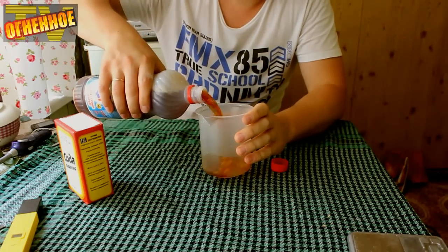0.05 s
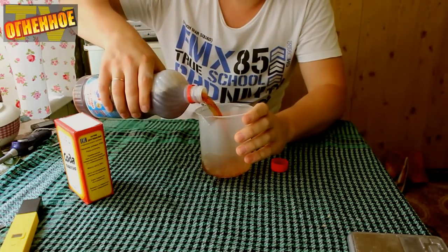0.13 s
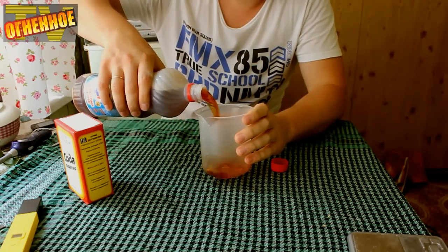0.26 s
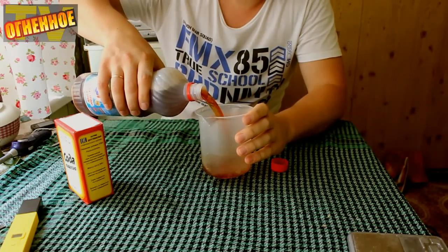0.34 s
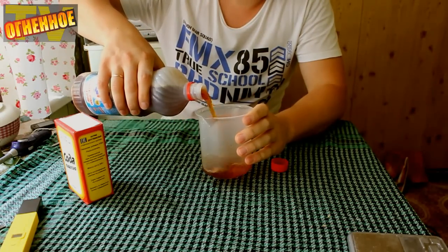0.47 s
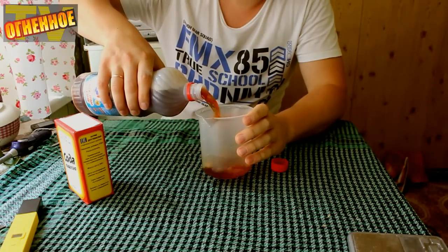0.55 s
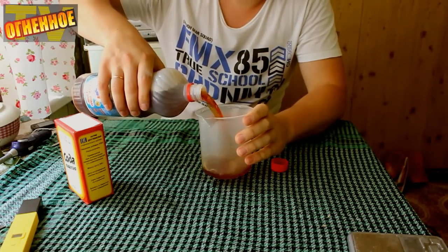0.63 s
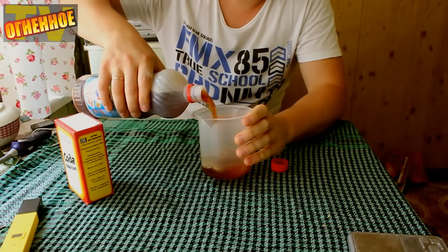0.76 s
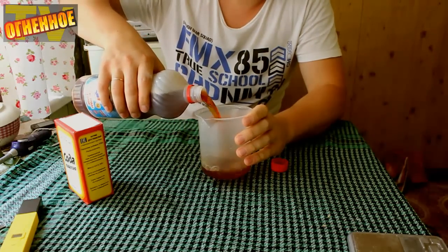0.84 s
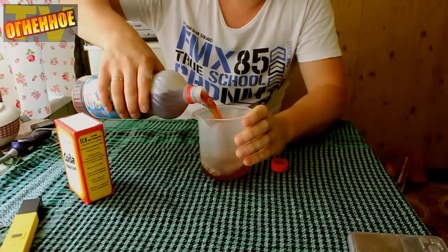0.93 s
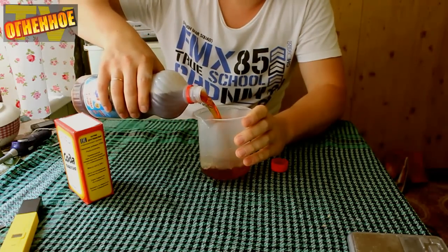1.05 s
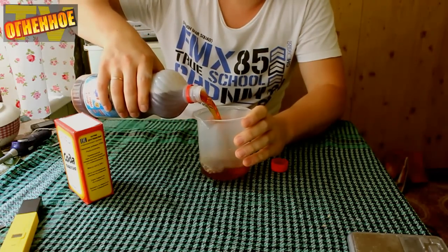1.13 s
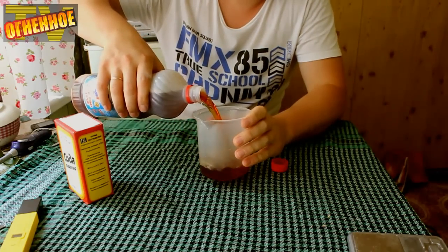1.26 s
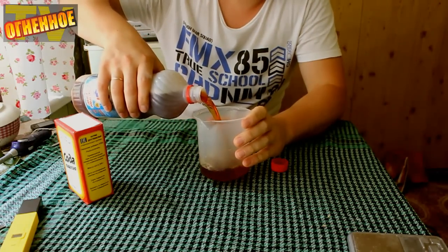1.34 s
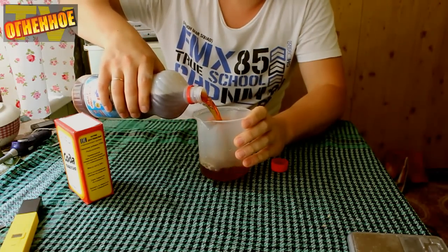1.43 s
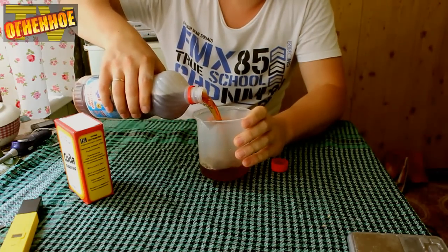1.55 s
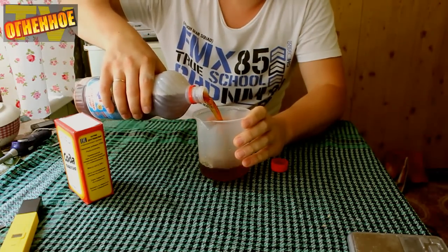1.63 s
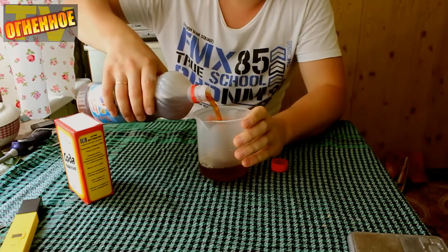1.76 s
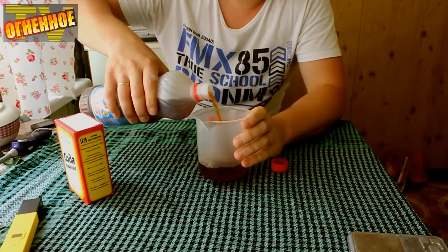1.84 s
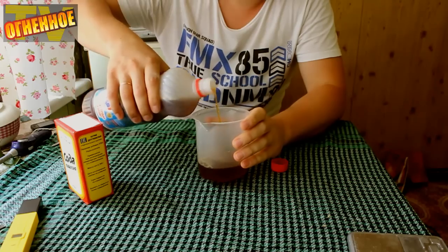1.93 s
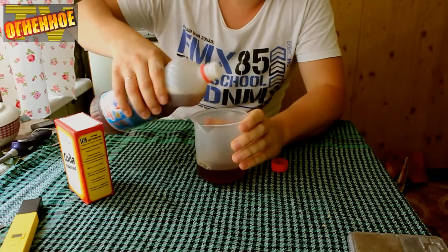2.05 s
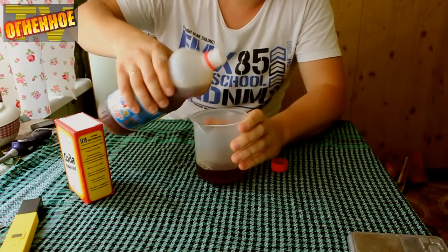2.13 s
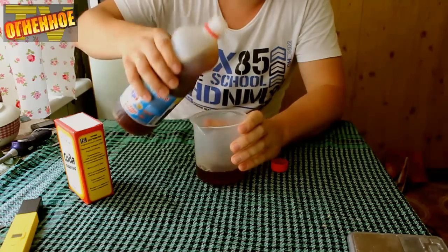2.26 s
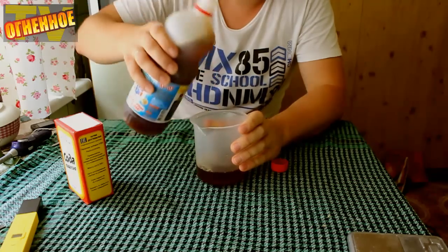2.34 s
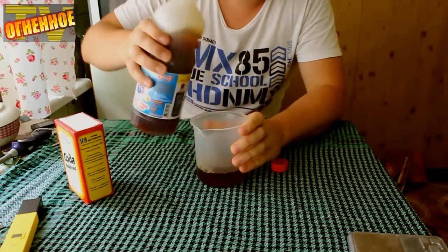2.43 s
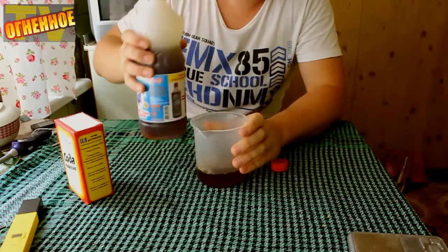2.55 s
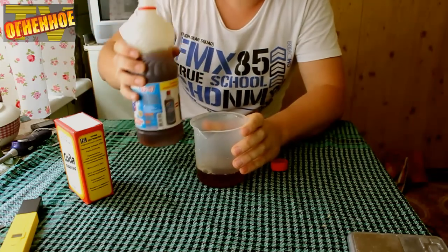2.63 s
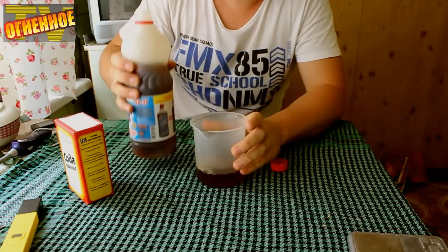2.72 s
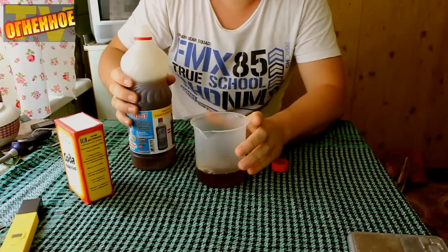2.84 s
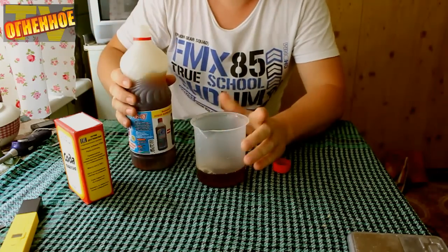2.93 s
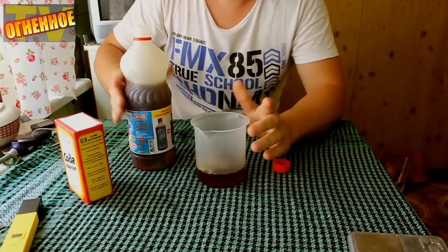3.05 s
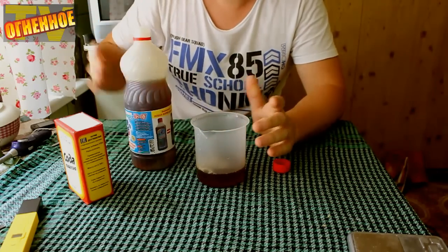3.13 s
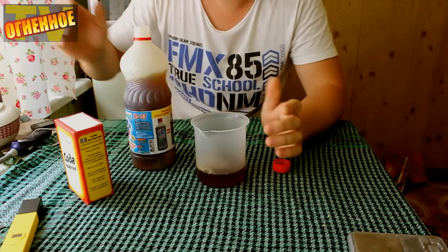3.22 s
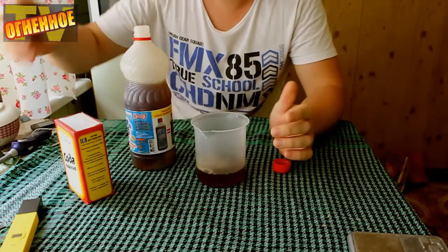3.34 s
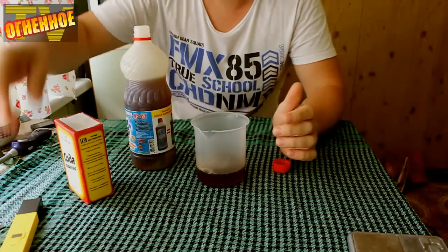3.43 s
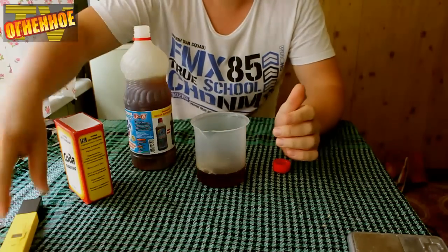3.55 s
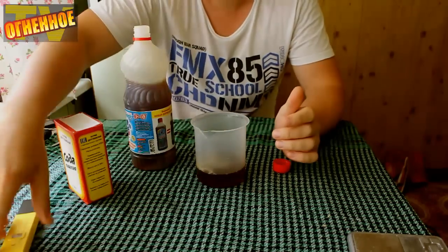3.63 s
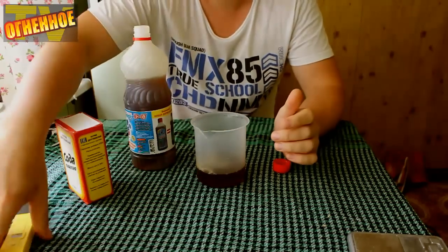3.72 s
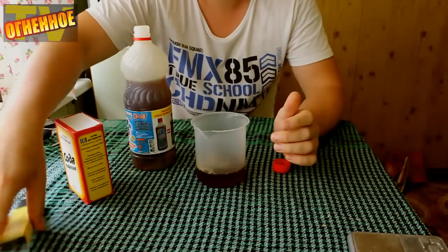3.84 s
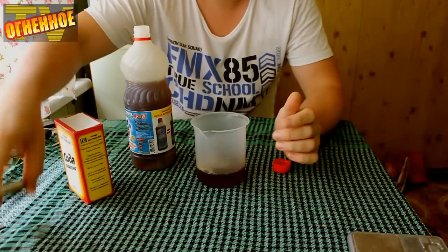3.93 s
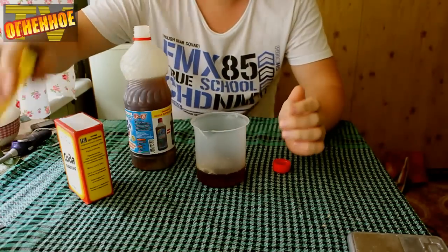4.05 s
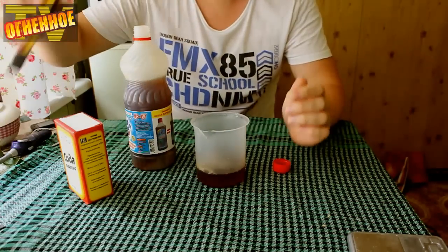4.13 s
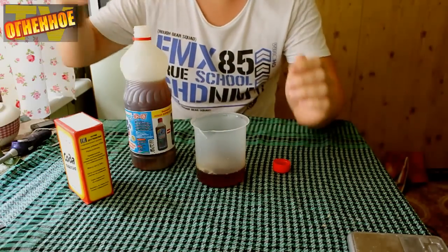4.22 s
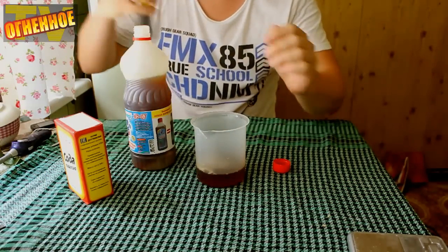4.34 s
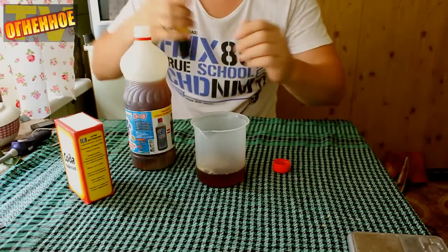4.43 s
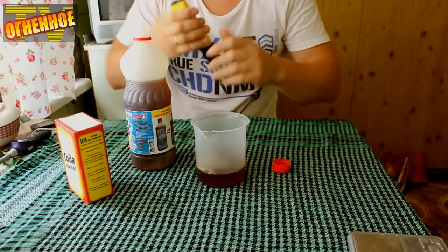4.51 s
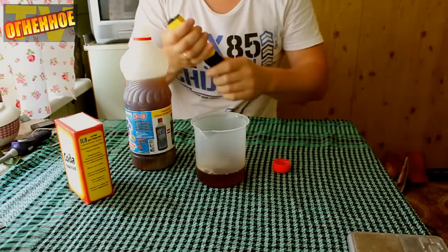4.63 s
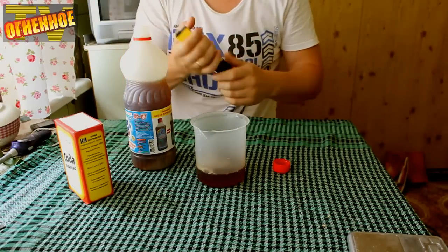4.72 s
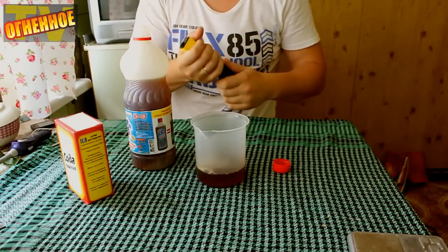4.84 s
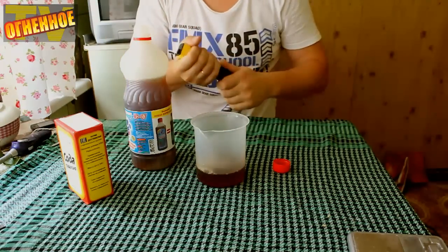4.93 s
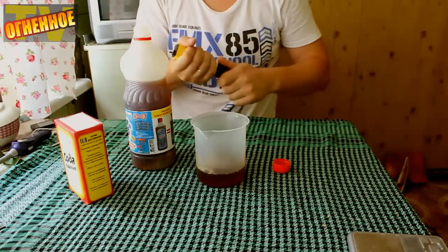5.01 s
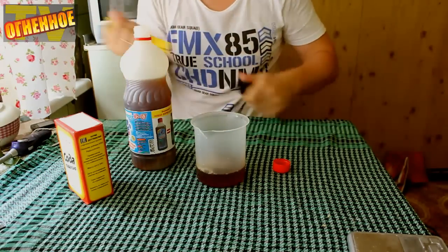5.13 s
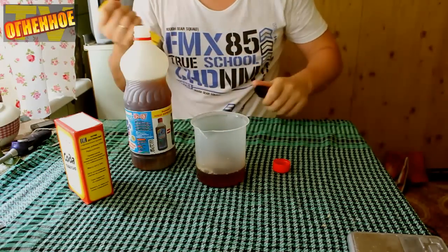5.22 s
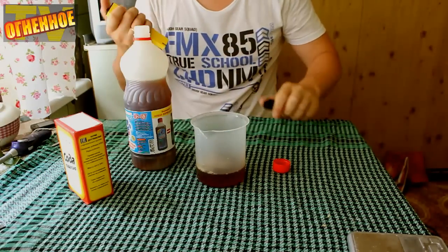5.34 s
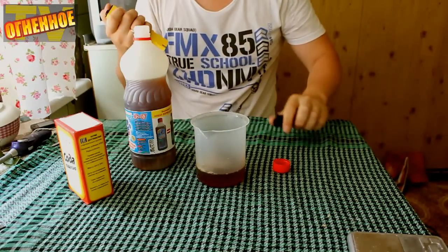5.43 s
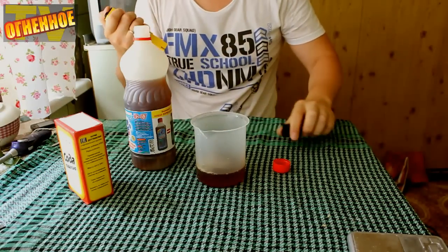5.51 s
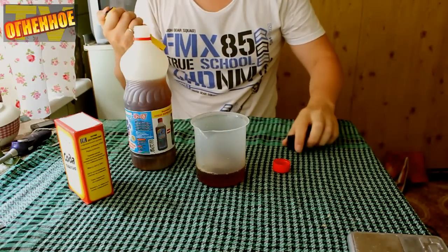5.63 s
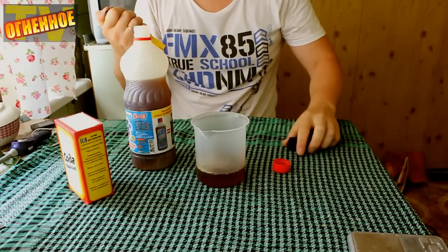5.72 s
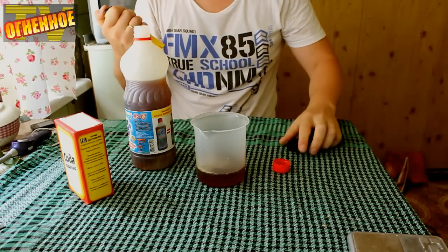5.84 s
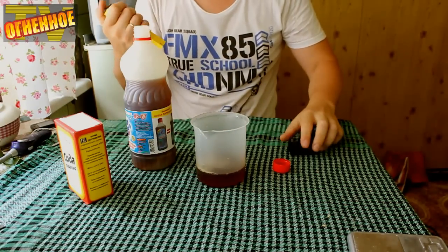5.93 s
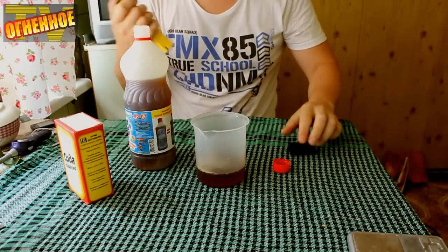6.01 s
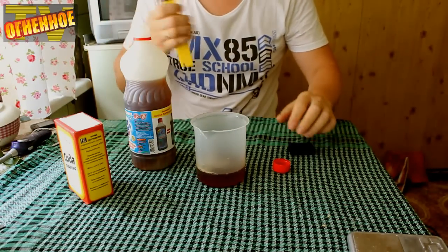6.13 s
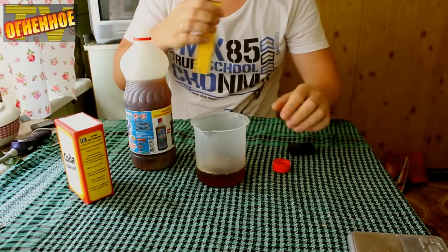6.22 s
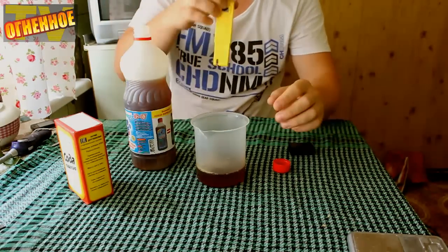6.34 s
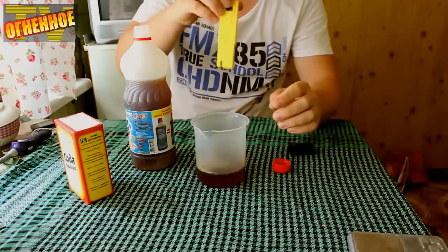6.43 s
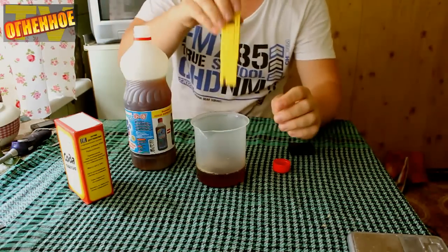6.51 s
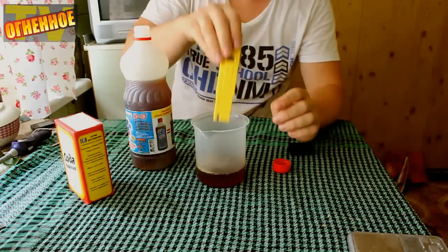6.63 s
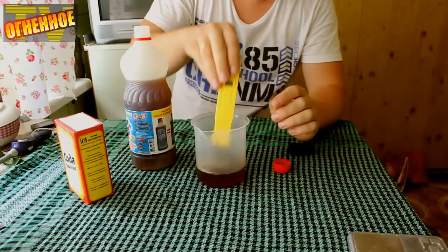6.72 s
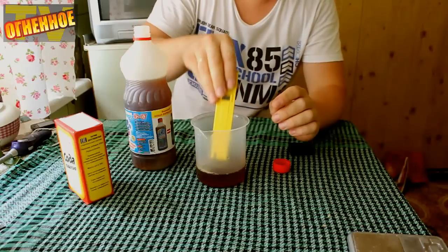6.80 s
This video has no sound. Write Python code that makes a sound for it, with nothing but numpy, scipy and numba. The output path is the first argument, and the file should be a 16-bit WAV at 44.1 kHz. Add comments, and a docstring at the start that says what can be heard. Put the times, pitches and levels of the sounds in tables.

```python
"""Over the hush of a small hard-walled room and a vehicle droning far outside, liquid is poured from a plastic
bottle into a plastic beaker: bubble swarms, spray and a climbing air-column note come in surges; last drops ring.
The bottle is set down (ringing table modes); a plastic pen-shaped meter is picked up (clicks, grainy rubs),
uncapped (stick-slip grains ring the cap's shell, then a pop) and its cap put down."""
import sys
import numpy as np
from scipy import signal
from scipy.fft import rfft, irfft
from scipy.io import wavfile
from scipy.ndimage import uniform_filter1d
from numba import njit

SR = 44100
rng = np.random.default_rng(int(sys.argv[2]) if len(sys.argv) > 2 else 0)


def unload_audio(sound):
    """Save the sound as a 16-bit wav file, at the path given as the first command line argument."""
    columns = np.transpose(np.atleast_2d(sound))
    # keep every value between -1 and 1, then stretch to whole-number steps
    steps = np.round(np.clip(columns, -1, 1) * 32767)
    wavfile.write(sys.argv[1], SR, steps.astype(np.int16))


N = 302967
T = np.arange(N) / SR
KHZ, REF_DB = 1000, -30  # pitch and level at which the width and damping settings hold


def undb(db):
    """dB to amplitude."""
    return 10 ** (np.asarray(db) / 20)


def unit(x):
    """Scale to rms 1."""
    return x / np.sqrt(np.mean(x ** 2))


def decay(t, t60_s):
    """Exponential fade, -60 dB at t60_s."""
    return np.exp(-np.log(1000) * t / t60_s)


def on_log(table, hz):
    """Read (Hz, value) points on a log-frequency axis."""
    f, v = np.transpose(table)
    return np.interp(np.log(np.maximum(hz, 1)), np.log(f), v)


def colour(x, spectrum):
    """Weight the spectrum of x by (Hz, dB) points."""
    freqs_hz = np.fft.rfftfreq(len(x), 1 / SR)
    return irfft(rfft(x) * undb(on_log(spectrum, freqs_hz)), len(x))


def walk(rate_hz):
    """Random levels held 1 / rate_hz and slewed twice; spread near 1."""
    k = int(SR / rate_hz)
    steps = np.repeat(rng.standard_normal(N // k + 1), k)
    return 1.196 * uniform_filter1d(uniform_filter1d(steps, k), k)[:N]


@njit
def svf(x, hz, width_hz):
    """State-variable band-pass with a moving centre, gain 1 at the centre."""
    y, b, l = np.empty(len(x)), 0., 0.
    for i in range(len(x)):
        g, k = np.tan(np.pi * hz[i] / SR), width_hz / hz[i]
        v = (b + g * (x[i] - l)) / (1 + g * (g + k))
        b, l, y[i] = 2 * v - b, l + 2 * g * v, k * v
    return y


def band(x, hz, width_hz):
    """Band-pass about a fixed or moving hz; the offset avoids denormals."""
    return svf(x + 1e-18, np.full(len(x), 1.) * hz, 1. * width_hz)


def tint(x, hz, share):
    """A broad colour about hz, steep on both sides: two passes, each share * hz wide."""
    return band(band(x, hz, share * hz), hz, share * hz)


@njit
def bubbles(start_s, size, hz, t60_s, rise):
    """Each bubble rings as a dying sine whose pitch climbs by the share rise as it nears the surface."""
    out = np.zeros(N)
    for j in range(len(hz)):
        i0, n, phase = int(start_s[j] * SR), int(t60_s[j] * SR), 0.
        for i in range(min(n, N - i0)):
            phase += 2 * np.pi * hz[j] * (1 + rise * i / n) / SR
            out[i0 + i] += size[j] * np.exp(-np.log(1000) * i / n) * np.sin(phase)
    return out


def add(out, start_s, x):
    """Mix x into out from start_s."""
    i = int(start_s * SR)
    out[i:i + len(x)] += x[:len(out) - i]


# hush spectrum: (frequency [Hz], relative density [dB per Hz])
HUSH_SPECTRUM = [(12, -40), (20, -5), (32, -22.5), (74, -3.5), (98, -3.5), (163, -7), (293, -11),
                 (328, -11), (357, -14.5), (976, -18), (1370, -21), (7730, -31.5), (16000, -43.5)]
HUSH_DB = -52.5


def hush():
    """Room and street noise: a wavering bass and a smooth hiss."""
    noise = colour(rng.standard_normal(N), HUSH_SPECTRUM)
    low = signal.sosfilt(signal.butter(2, 400, fs=SR, output="sos"), noise)
    bass_waver = undb(2.4 * walk(3.09)) - 1
    return undb(HUSH_DB) * unit(noise + low * bass_waver)


# brief low tones within the hush: (start [s], end [s], pitch [Hz], peak level [dB])
HUSH_TONES = [(0.296, 1.094, 124, -55), (0.095, 1.5, 148, -60), (3.765, 4.195, 273.4, -59.5),
              (4.894, 5.791, 151.4, -56.5), (5.801, 6.2, 125.8, -64), (6.302, 6.871, 175, -60.5)]


def hush_tones(fade_s=0.063):
    """Brief low tones that waver in pitch and level within the background hush."""
    out = np.zeros(N)
    for start, end, hz, db in HUSH_TONES:
        fade = np.clip(np.minimum(T - start, end - T) / fade_s, 0, 1)
        level = undb(db + 2.0 * walk(7))
        phase = 2 * np.pi * np.cumsum(hz * (1 + 0.0155 * walk(7.3))) / SR
        out += fade * level * np.sin(phase)
    return out


# engine harmonics: (multiple of firing rate [-], level [dB])
HARMONICS = [(1, -0.5), (2, -15.5), (3, -11.5)]
# the engine revs up, slows and idles: (time [s], firing rate [Hz])
FIRING_RATE = [(.2, 83.5), (1.0, 97.2), (1.5, 102.6), (2.2, 110), (3.2, 108.1), (3.65, 96.6), (3.95, 80.3),
               (4.3, 75.3), (6.87, 73.6)]
# its level dips now and then: (time [s], level [dB])
DRONE_LEVEL = [(.2, -62), (.7, -62), (1.5, -51), (2.3, -60.5), (3.65, -54.5), (3.9, -61.5), (4.2, -51.5),
               (4.55, -61.5), (4.66, -78), (4.77, -55), (5.17, -58), (5.25, -81), (5.45, -62), (5.6, -66),
               (5.8, -54), (5.95, -60.5), (6.87, -56)]


def engine():
    """Low orders of a far engine, wavering on the way."""
    firing_hz = np.interp(T, *np.transpose(FIRING_RATE)) * (1 + 0.0107 * walk(8.3))
    turn = 2 * np.pi * np.cumsum(firing_hz) / SR
    tone = sum(undb(db + 2.0 * walk(9.7)) * np.sin(k * turn) for k, db in HARMONICS)
    return np.sqrt(2) * tone * undb(np.interp(T, *np.transpose(DRONE_LEVEL)))


# reverberation time of the room: (frequency [Hz], t60 [s])
REVERB_T60 = [(150, 0.31), (1000, 0.43), (4000, 0.39), (12000, 0.24)]
ROOM_DB, ROOM_GAP_S, ROOM_TILT_DB_PER_OCTAVE = -3.5, 0.00334, -0.5


def room(x):
    """Dense, slightly dull reflections that die faster in the deep bass and top treble."""
    t, tail = T[:SR], 0
    for octave in range(8):
        hz = 125 * 2 ** octave
        noise = band(rng.standard_normal(SR), hz, 0.94 * hz)
        tail = tail + undb(ROOM_TILT_DB_PER_OCTAVE * octave) * noise * decay(t, on_log(REVERB_T60, hz))
    tail = tail * (t > ROOM_GAP_S)
    tail = tail / np.sqrt(np.sum(tail ** 2))
    return x + undb(ROOM_DB) * signal.fftconvolve(x, tail)[:N]


# last splashes, slosh in the bottle, scrapes and rustles of hands, plastic and cloth:
# (time [s], length [s], rms level before shaping in time [dB], colour centre [Hz])
RUB_EVENTS = [(1.928, 0.095, -53, 6840), (1.965, 0.14, -58, 1540), (2.39, 0.28, -56, 203),
              (2.427, 0.047, -55.5, 905), (2.775, 0.08, -43.5, 1570), (2.779, .14, -46.5, 734),
              (2.775, 0.059, -45, 3500), (2.594, 0.043, -52, 4960), (2.818, 0.063, -47.5, 5030),
              (2.907, 0.039, -53, 3500), (3.22, .04, -62, 2720), (3.424, 0.084, -55, 890),
              (3.633, 0.031, -56.5, 4800), (3.662, 0.1, -56, 6140), (3.724, 0.013, -50, 8000),
              (3.725, 0.047, -53, 1650), (3.883, 0.085, -61.5, 8000), (4.01, 0.15, -63, 2500),
              (4.236, 0.048, -56, 2473), (4.426, 0.051, -59, 1200), (4.532, 0.087, -58.5, 2560),
              (4.569, 0.043, -51.5, 5600), (4.572, 0.069, -51.5, 2350), (4.821, 0.062, -61, 7440),
              (4.828, 0.081, -61, 2570), (5.417, 0.078, -56.5, 940), (5.506, 0.089, -57.5, 2530),
              (5.655, 0.016, -34.5, 3100), (5.793, 0.044, -52, 4260), (5.802, 0.12, -60.5, 2000),
              (6.032, 0.17, -59, 2660), (6.093, 0.082, -58.5, 7900), (6.379, 0.14, -63.5, 2950),
              (6.409, 0.061, -56, 940)]
# width over centre of each pass at 1 kHz, -30 dB; wider when brighter (power) or harder (dB per dB)
RUB_WIDTH, RUB_GROWTH, RUB_HARDENING = 1.23, 0.42, 0.33


def rubs(grain_db=3.5):
    """Short bursts of grainy noise that start fast and thin out."""
    out, grain = np.zeros(N), rng.standard_normal(N) * undb(grain_db * walk(300))
    for start, length, db, hz in RUB_EVENTS:
        i, n = int(start * SR), int(length * SR)
        u = np.arange(n) / n
        width = RUB_WIDTH * (hz / KHZ) ** RUB_GROWTH * undb(RUB_HARDENING * (db - REF_DB))
        burst = unit(tint(grain[i:i + n], hz, width))
        add(out, start, undb(db) * burst * np.minimum(8 * u, 1) * np.minimum(2.0 * (1 - u), 1))
    return out


# plastic clicks: (time [s], peak level [dB], colour centre [Hz])
CLICK_EVENTS = [(2.724, -36, 4470), (2.788, -23.5, 3000), (3.216, -44.5, 990), (3.349, -40.5, 880),
                (3.722, -24, 2150), (3.823, -39, 9450), (3.988, -23.5, 5300), (4.007, -28.5, 2410),
                (4.244, -39.5, 6300), (4.43, -40, 1004), (4.576, -49, 7000), (4.822, -40.5, 2390),
                (4.995, -19, 5860), (5.186, -33, 7000), (5.552, -39, 8500), (5.656, -22, 6740)]
# width over centre of each pass at -30 dB; harder clicks are wider, dB per dB
CLICK_WIDTH, CLICK_HARDENING = 0.94, 0.61


def clicks(crack_s=0.0031):
    """A sharp tick and a short crackle through the colour of the struck plastic."""
    t, out = T[:SR // 20], np.zeros(N)
    for start, db, hz in CLICK_EVENTS:
        crackle = 0.12 * rng.standard_normal(len(t)) * np.exp(-t / crack_s)
        width = CLICK_WIDTH * undb(CLICK_HARDENING * (db - REF_DB))
        tick = tint((t == 0) + crackle, hz, width)
        add(out, start, undb(db) * tick / np.abs(tick).max())
    return out


# modes of the cap's shell: (frequency [Hz], width [Hz], relative level [dB])
SHELL_MODES = [(600, 610, -11), (1630, 220, -12), (1864, 360, -1), (2194, 400, 2), (2830, 290, -0.5),
               (3500, 540, 2), (5000, 770, -0.5), (8300, 2700, -1.5), (13670, 1900, -11)]
SLIDE_S, SLIDE_DB = 4.995, -28  # the cap starts to slide off the meter
POP_S, POP_DB = 5.026, -14.5  # it pops free
POP_DB_PER_S, RATTLE_DB_PER_S = 1700, 600  # slope either side of the pop; fade of the rattle after


def cap():
    """Stick-slip grains of the sliding cap ring its hollow shell."""
    slip = rng.standard_normal(N) * undb(1.1 * walk(500))
    shell = np.zeros(N)
    for hz, width_hz, db in SHELL_MODES:
        # two passes, each 1.5 times wider, together about width_hz
        mode = band(band(slip, hz, 1.5 * width_hz), hz, 1.5 * width_hz)
        shell += undb(db) * mode / np.sqrt(width_hz)
    slide_db = SLIDE_DB - RATTLE_DB_PER_S * np.maximum(T - POP_S, 0)
    pop_db = POP_DB - POP_DB_PER_S * np.abs(T - POP_S)
    return unit(shell) * undb(np.maximum(slide_db, pop_db)) * (T > SLIDE_S)


# table-top modes: (frequency [Hz], relative level [dB], t60 [s])
TOP_MODES = [(58.1, -21, 1), (94, -17, 0.28), (122.8, -3, 0.28), (134.5, -9, 0.48), (166, -5, 0.12),
             (223, -1, 0.22), (294, 11, 0.035), (318, 1.5, 0.52), (330, -6.5, 0.57), (384, -26, 0.29),
             (537, -39, 0.26), (700, -18, 0.18), (930, -14, 0.28)]
# blows on the table top: (time [s], drive level [dB], push length [s])
BLOWS = [(2.388, -45, 0.0059), (2.426, -54, 0.0021), (2.767, -52, 0.003), (2.784, -19.5, 0.00256),
         (2.795, -19.5, 0.002)]


def table():
    """A soft push of the bottle's foot sets the table top ringing; neighbouring modes move in opposite sense."""
    t, ring, out = T[:SR], np.zeros(SR), np.zeros(N)
    for k, (hz, db, t60_s) in enumerate(TOP_MODES):
        ring += (-1) ** k * undb(db) * decay(t, t60_s) * np.sin(2 * np.pi * hz * t)
    for start, db, push_s in BLOWS:
        push = np.hanning(int(push_s * SR) + 3)
        add(out, start, undb(db) * np.convolve(ring, push / push.sum()))
    # a panel open on both sides radiates little deep bass
    return signal.sosfilt(signal.butter(2, 55, "high", fs=SR, output="sos"), out)


# single bubbles and drops, and at 2.724 s a short click ringing near 2.7 kHz:
# (time [s], peak level [dB], starting pitch [Hz])
LONE_RINGS = [(0.111, -44, 4660), (0.174, -33.5, 1090), (0.178, -27.5, 2520), (.205, -37.5, 670),
              (0.214, -32, 1213), (.383, -35, 672), (0.467, -34, 938), (.654, -32.5, 600),
              (0.655, -45.5, 422), (0.747, -26, 2570), (0.804, -20.5, 2540), (0.805, -27.5, 1442),
              (0.805, -26, 4750), (1.027, -36, 4700), (1.108, -43, 817), (1.11, -39, 3600),
              (1.111, -33, 2490), (1.18, -44, 854), (1.23, -48.5, 930), (1.301, -42, 2700),
              (1.317, -40, 5100), (1.35, -44, 2116), (1.429, -51, 1124), (1.49, -51, 930),
              (1.687, -45, 5000), (1.714, -37.5, 3840), (1.82, -44, 2670), (1.928, -40, 1430),
              (1.965, -34, 1440), (1.966, -39.5, 2060), (1.975, -36, 1410), (1.965, -34, 3500),
              (1.991, -21.5, 2568), (2.004, -26, 2614), (1.993, -54, 2010), (1.994, -35, 1425),
              (2.022, -39, 1520), (2.023, -28, 5140), (2.029, -34, 1293), (2.058, -47, 1330),
              (2.593, -46, 2700), (2.613, -40.5, 2640), (2.724, -36, 2740), (2.835, -34, 2650),
              (2.86, -36, 2650)]
DROP_T60_S, DROP_DAMPING = 0.062, 0.98  # ring at 1 kHz; it shortens as this power of the pitch
TWIN_DB, TWIN_DETUNE, TWIN_LAG_S = -8.5, 0.071, .008  # neighbours: level, largest detune share, largest lag


def drops(spray_db=-14, spray_s=0.0035):
    """Lone bubbles, last drips and a short click ring, each with two smaller neighbours and a fleck of noise."""
    s, db, hz = np.transpose(LONE_RINGS)
    t60_s, t = DROP_T60_S * (hz / KHZ) ** -DROP_DAMPING, T[:SR // 20]
    out = bubbles(s, undb(db), hz, t60_s, 0.14)
    for lag, detune in rng.random((len(s), 2, 2)).T:
        twin_hz = hz * (1 + TWIN_DETUNE * (2 * detune - 1))
        out = out + bubbles(s + TWIN_LAG_S * lag, undb(db + TWIN_DB), twin_hz, t60_s, 0.13)
    for start, size in zip(s, undb(db + spray_db)):
        fleck = band(rng.standard_normal(len(t)), 5900, 4100)
        add(out, start, size * fleck * np.exp(-t / spray_s))
    return out


POUR_END_S = 1.9
SPATTER_DB, SPATTER_SCATTER_DB = -13, 5  # flung droplets: level against the splash, spread of sizes


def spatter():
    """Lone droplets tick against the beaker wall."""
    when, luck = rng.random((260, 2)).T
    ticks = np.zeros(N)
    ticks[(when * POUR_END_S * SR).astype(int)] = undb(np.minimum(-SPATTER_SCATTER_DB * np.log(luck), 16))
    return tint(ticks, 6000, 0.92)


# splash colour: (frequency [Hz], relative level [dB per Hz])
SPLASH_SPECTRUM = [(590, -48), (1000, -3), (1170, -5.5), (1300, -8.5), (1860, -1), (2560, 1.5), (3740, 1),
                   (4760, 1.5), (8250, -13.5), (15500, -26)]
# air modes across the beaker: (frequency [Hz], width [Hz], level [dB])
BEAKER_MODES = [(2500, 910, -11), (3430, 260, -7), (4750, 1200, -8), (1310, 220, -10)]
# the bottle glugs, so the stream comes in surges: (time [s], splash level [dB], air-column level [dB])
GLUGS = [(0.0, -36, -41), (0.106, -35.5, -46.5), (0.213, -35.5, -44), (0.372, -38, -43.5),
         (0.503, -35.5, -49), (0.659, -37.5, -44.5), (0.808, -38.5, -44.5), (0.97, -68, -52),
         (1.036, -49.5, -62), (1.128, -45, -49.5), (1.338, -48.5, -79), (1.45, -55, -64), (1.63, -59, -86),
         (1.714, -60, -83), (1.872, -60, -87)]
SWELL_DB_PER_S, FADE_DB_PER_S = 213, 141  # slopes before and after the top of a surge
SPRAY_DB, SPRAY_GROWTH = -51, 1.5  # spray under a -40 dB splash; dB of spray per dB of splash
COLUMN_HZ, CLIMB_HZ_PER_S, WOBBLE = 705, 87, .05  # air-column note at the start, climb, unsteady share


def stream(cycles=30, scatter_db=3.5, burst_s=.012, kin=0.18, froth_db=-6):
    """Bubble bursts and froth ring the beaker's air; spray hisses beside; gulping noise sounds the air column."""
    s, top_db, top_column_db = np.transpose(GLUGS)[:, :, None]
    slope_db = np.where(T < s, SWELL_DB_PER_S * (T - s), FADE_DB_PER_S * (s - T))
    splash_db = np.max(top_db + slope_db, axis=0)
    column_db = np.max(top_column_db + slope_db, axis=0)
    spray_db = SPRAY_DB + SPRAY_GROWTH * (splash_db + 40)
    wet = T < POUR_END_S

    # the jet drags in 1100 bursts of 4 bubbles; a burst shares time, pitch and luck
    when, pitch, luck = rng.random((1100, 3)).T[:, :, None]
    lag, spread, own = rng.random((1100, 4, 3)).T.swapaxes(1, 2)
    start_s = (when * POUR_END_S - burst_s * np.log(lag)).ravel()
    hz = (1000 * 8 ** pitch * (1 + kin * (spread - .5))).ravel()
    size_db = np.minimum(-scatter_db * np.log(luck * own), 14).ravel()
    swarm = bubbles(start_s, undb(size_db) * np.sqrt(hz), hz, cycles / hz, 0.16)

    froth = undb(froth_db) * rng.standard_normal(N) * wet
    splash = colour(unit(swarm) + froth, SPLASH_SPECTRUM)
    splash = splash + sum(undb(db) * band(splash, f, w) for f, w, db in BEAKER_MODES)
    spray = band(rng.standard_normal(N) * undb(2.6 * walk(230)) * wet, 6700, 3100)

    # the air above the liquid is a pipe closed below: it shortens, so its note climbs
    gulps = rng.standard_normal(N) * undb(3.0 * walk(60.9)) * wet
    pipe_hz = (COLUMN_HZ + CLIMB_HZ_PER_S * T) * (1 + WOBBLE * walk(15.47))
    column = band(band(gulps, pipe_hz, 154), pipe_hz, 154)

    layers = ((splash, splash_db), (spray, spray_db), (column, column_db),
              (spatter(), splash_db + SPATTER_DB))
    # unit() averages over the whole length; the root makes levels hold within the pour
    return np.sqrt(np.mean(wet)) * sum(unit(x) * undb(db) for x, db in layers)


def scene():
    """Near sources ring the room; table, engine, hush and its tones are added directly."""
    knocks = table()
    near = stream() + drops() + clicks() + rubs() + cap() + undb(0.5) * knocks
    return (room(near) + knocks + engine() + hush_tones() + hush())[None]


TOP_HZ = 15900


def record(dry):
    """A steep low-pass cuts the treble above TOP_HZ."""
    return signal.sosfilt(signal.ellip(10, .2, 80, TOP_HZ, fs=SR, output="sos"), dry)


dry = scene()
out = record(dry)
unload_audio(out)
```